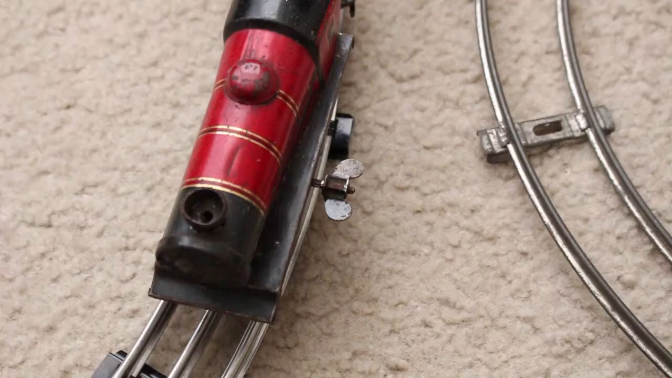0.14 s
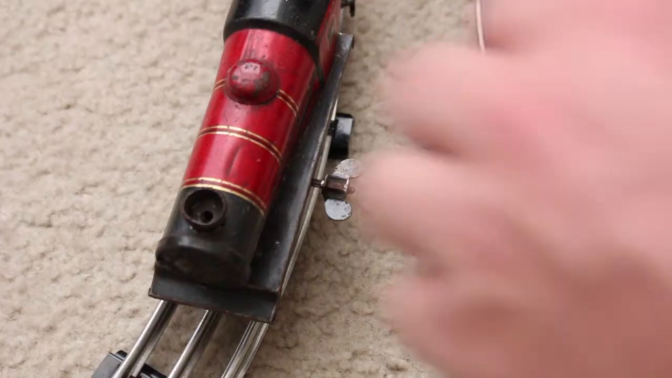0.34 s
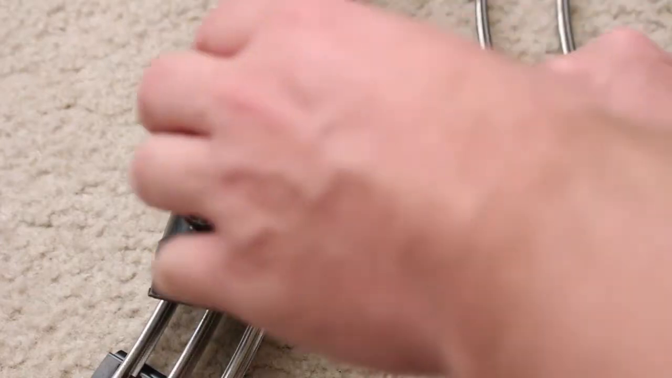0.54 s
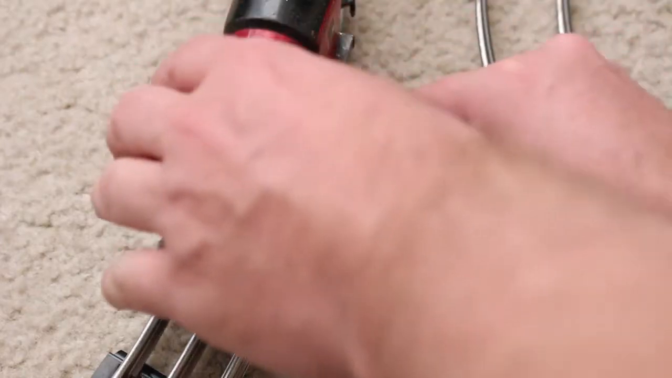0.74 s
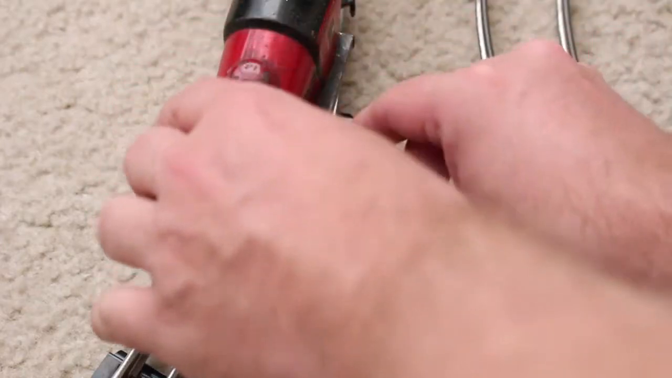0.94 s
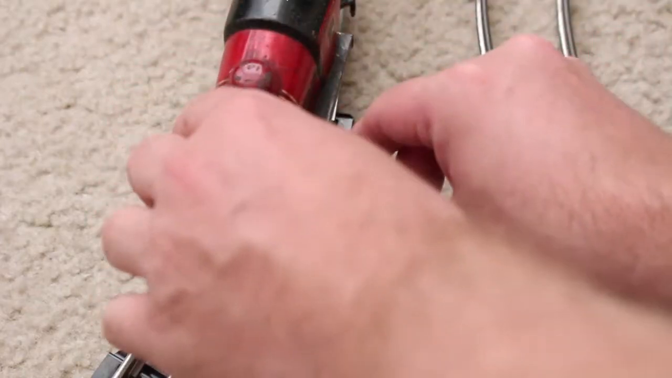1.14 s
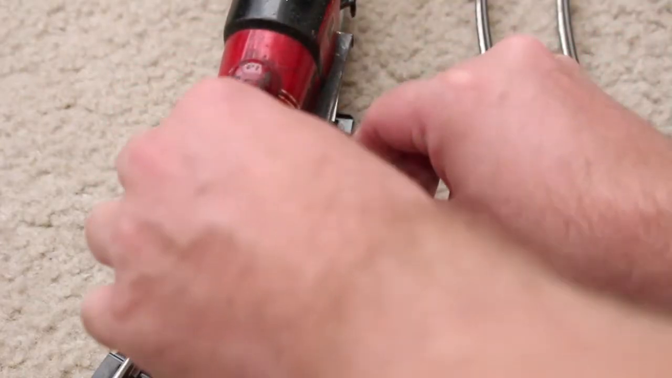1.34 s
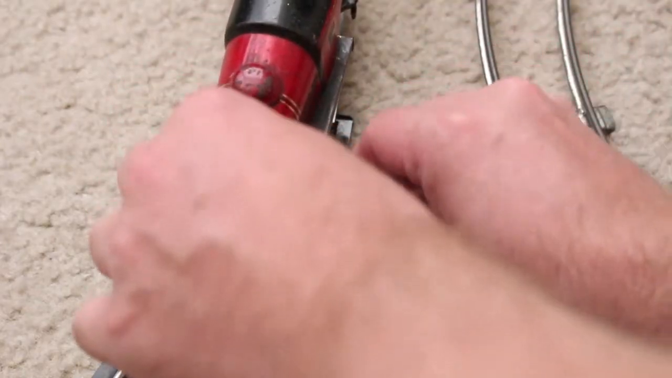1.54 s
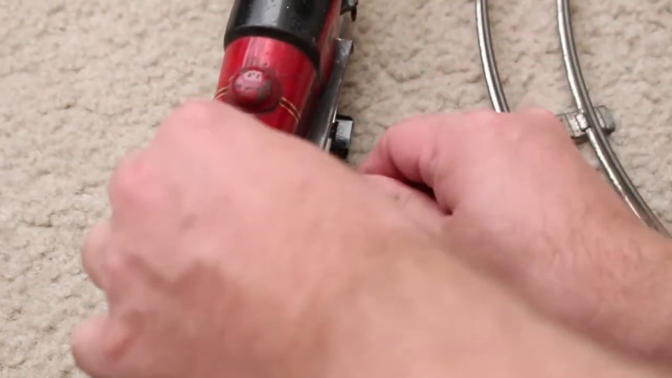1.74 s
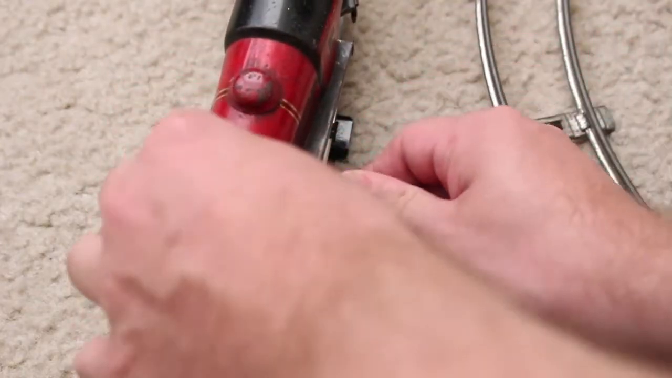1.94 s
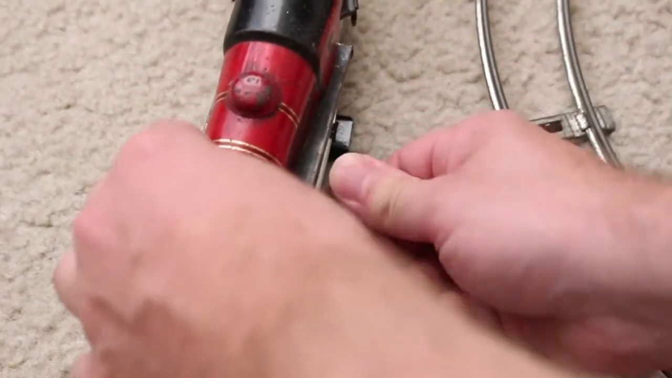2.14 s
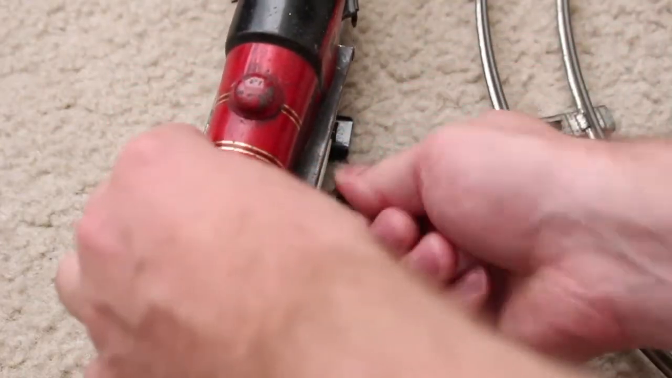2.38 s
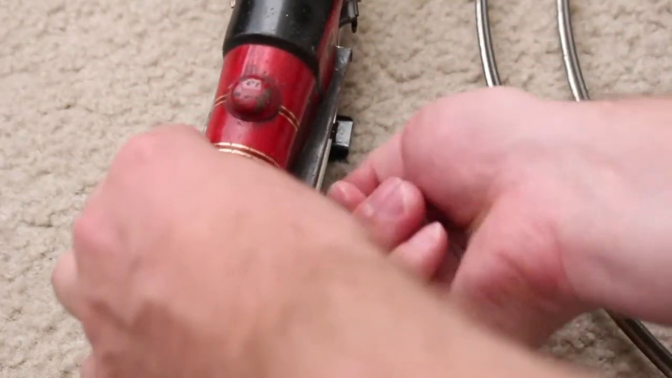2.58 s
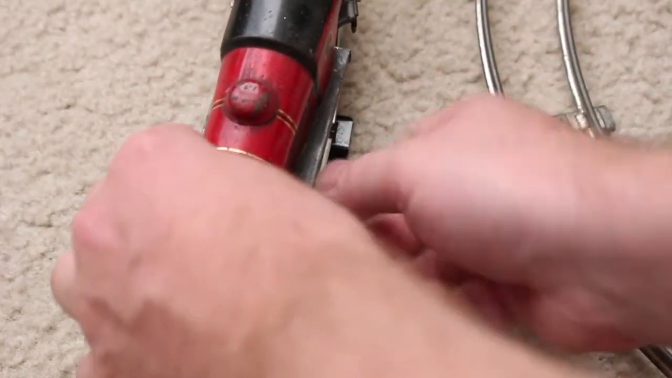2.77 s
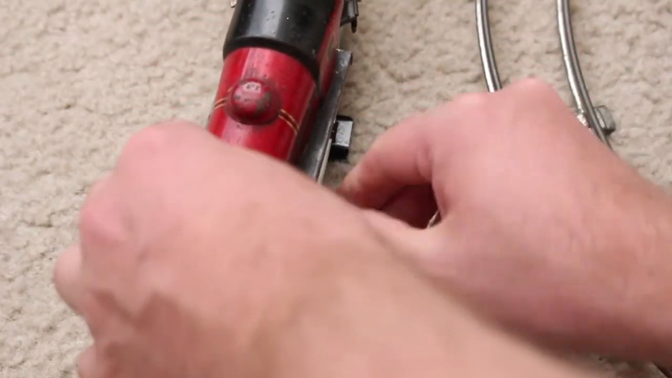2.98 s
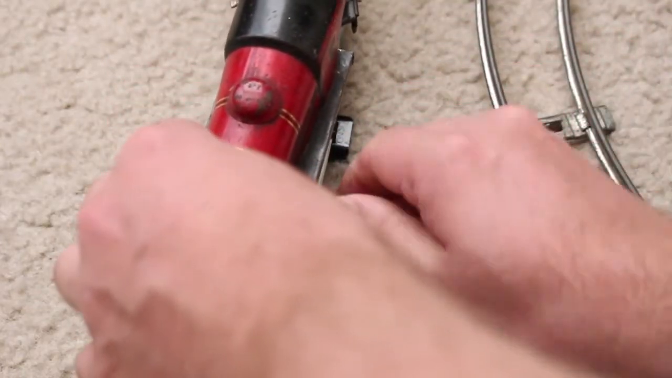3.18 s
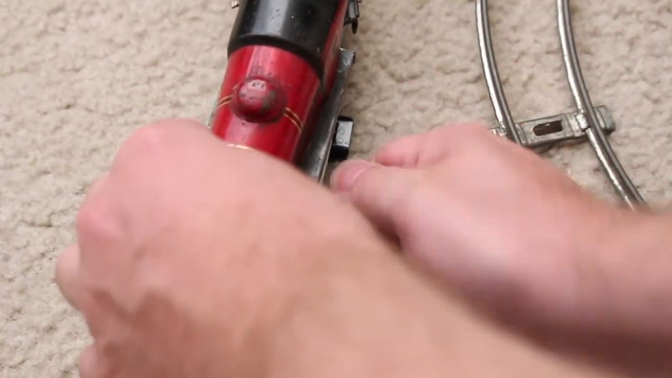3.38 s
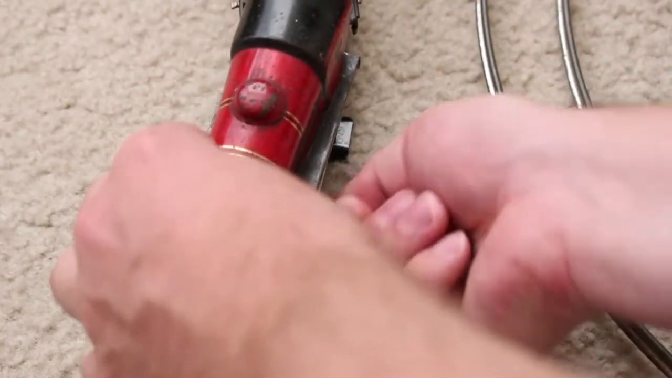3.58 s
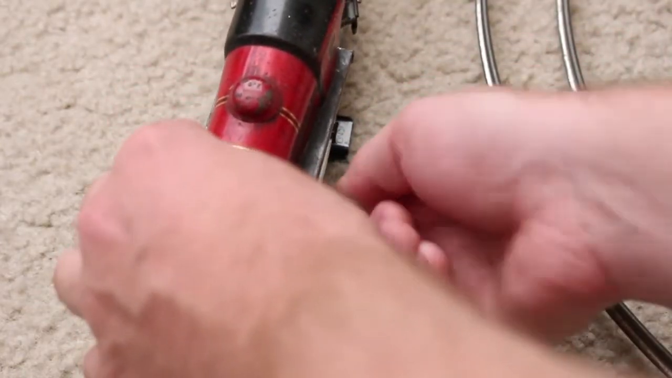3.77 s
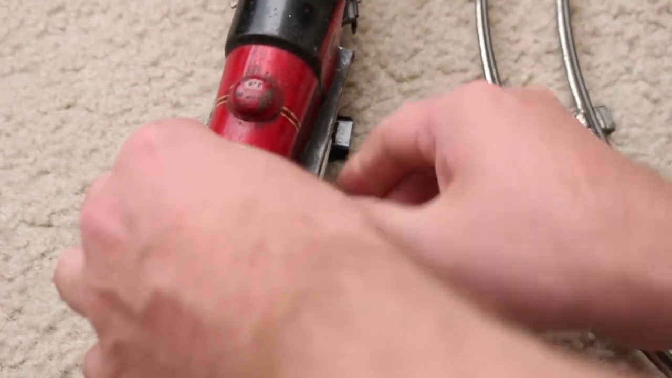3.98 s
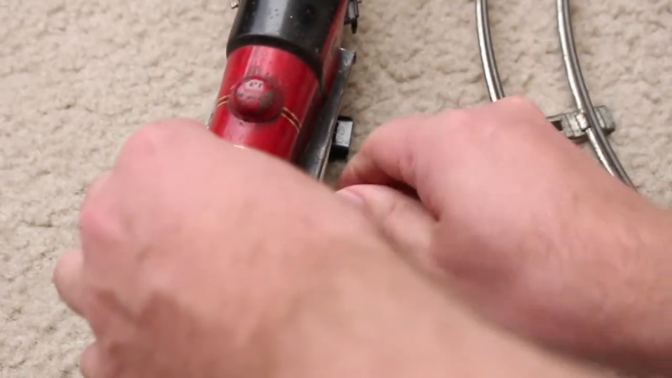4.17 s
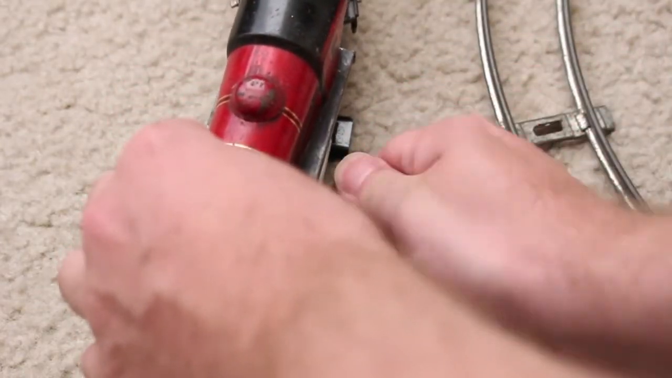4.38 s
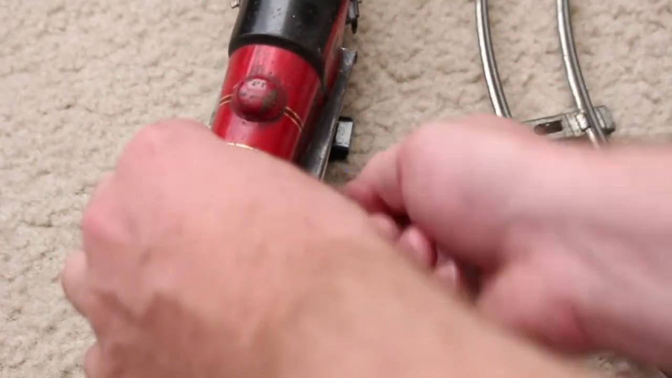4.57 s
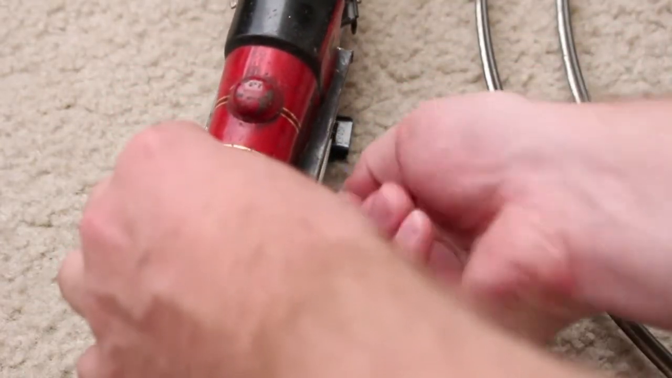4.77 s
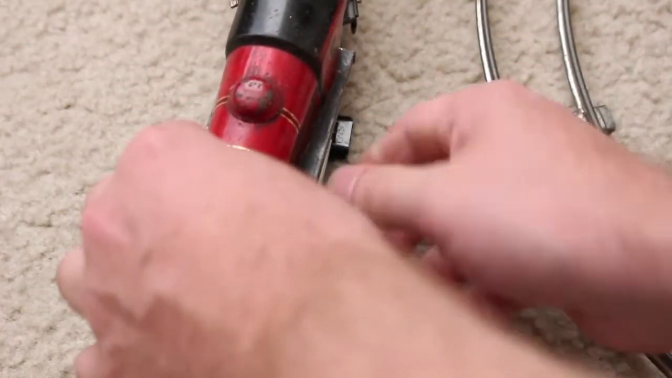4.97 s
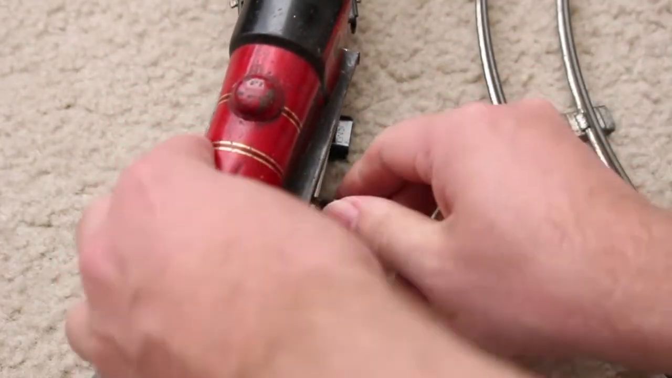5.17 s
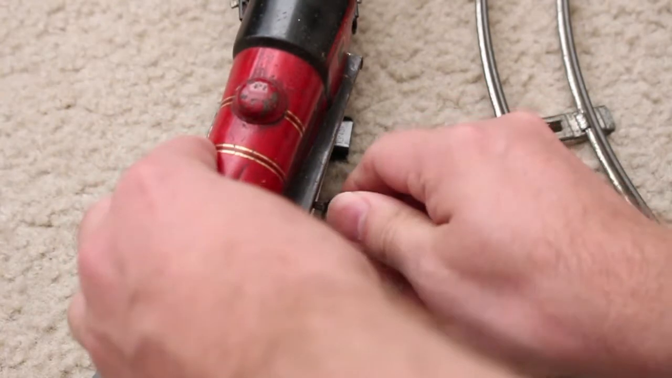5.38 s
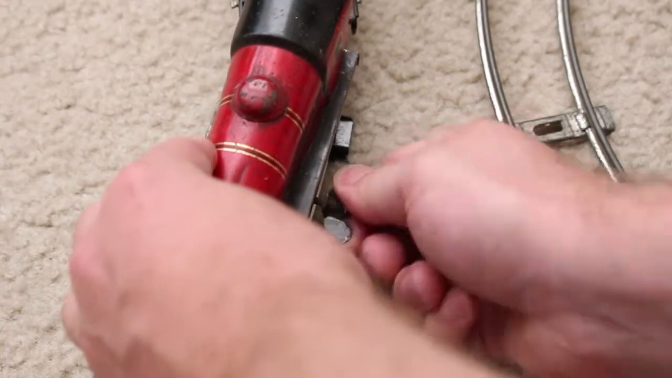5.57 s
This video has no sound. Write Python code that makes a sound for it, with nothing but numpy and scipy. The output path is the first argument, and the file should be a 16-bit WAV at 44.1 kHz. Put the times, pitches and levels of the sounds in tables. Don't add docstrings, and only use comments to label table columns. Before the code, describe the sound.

A tin clockwork toy engine is wound by key in a quiet carpeted room, giving short bursts of hard ratchet clicks.

```python
import sys
import numpy as np
from scipy import signal
from scipy.fft import rfft, irfft, next_fast_len
from scipy.io import wavfile

SR = 44100
rng = np.random.default_rng(int(sys.argv[2]) if len(sys.argv) > 2 else 0)


def linear_from_db(decibels):
    return 10 ** (np.asarray(decibels, float) / 20)


def put_to_file(sound):
    columns = np.atleast_2d(sound).T
    safe = np.clip(columns, -1, 1)
    whole_steps = np.round(safe * 32767)
    wavfile.write(sys.argv[1], SR, whole_steps.astype(np.int16))


N = 247842


def rms_one(x):
    return x / np.sqrt(np.mean(x ** 2) + 1e-20)


def at_hz(points, hz):
    table_hz, values = np.array(points).T
    return np.interp(np.log(hz), np.log(table_hz), values)


def butter(x, order, hz, kind):
    return signal.sosfilt(signal.butter(order, hz, kind, fs=SR, output="sos"), x)


# time in seconds, level in dB.
PRESSES = [(0.5, -72), (1.76, -69.5), (2.3, -64), (2.65, -70), (2.98, -72), (3.41, -55), (3.8, -69),
           (4.5, -62.5), (4.75, -61.5), (5.3, -61.5)]


def rumble():
    lumps = butter(rng.standard_normal((2, N)), 2, [55, 105], "band")
    t = np.arange(N) / SR
    press_s, resting_db = 0.093, -77.5
    load = linear_from_db(resting_db)
    for s, db in PRESSES:
        load = load + linear_from_db(db) * np.exp(-((t - s) / press_s) ** 2)
    return linear_from_db(12.0) * load * rms_one(lumps) * linear_from_db([[-2.5], [2.5]])


# frequency in Hz, density in dB per Hz.
HISS = [(25, -15), (70, -18), (195, -4), (285, -12), (2000, -17.5), (4490, -21), (15000, -30), (16100, -58)]
# frequency in Hz, correlation from -1 to 1.
LIKENESS = [(60, 0.72), (130, 0.73), (290, 0.44), (640, -0.11), (1410, 0.073), (3100, -0.22),
            (6820, 0.0086), (15000, -0.0071)]
# frequency in Hz, left minus right in dB.
LEANING = [(60, -7), (240, -3), (950, -1.0), (3770, -0.5), (15000, -2)]


def hiss():
    hz = np.maximum(np.fft.rfftfreq(N, 1 / SR), 1)
    mid, side = rfft(rng.standard_normal((2, N)))
    alike = np.clip(at_hz(LIKENESS, hz) - 0.12, -1, 1)
    lean_db = at_hz(LEANING, hz) / 2
    shared, opposed = np.sqrt(1 + alike) * mid, np.sqrt(1 - alike) * side
    left = (shared + opposed) * linear_from_db(lean_db)
    right = (shared - opposed) * linear_from_db(-lean_db)
    return linear_from_db(-46) * rms_one(irfft(np.array([left, right]) * linear_from_db(at_hz(HISS, hz)), N))


# frequency in Hz, t60 in seconds.
ROOM = [(300, 0.72), (800, 0.51), (2100, 0.35), (5500, 0.3), (14600, 0.08)]
# frequency in Hz, side over mid in dB.
WIDTH = [(400, -3), (1500, -5.5), (2500, -6), (5000, -4.5), (12000, 1)]
# frequency in Hz, level in dB.
WETNESS = [(400, -1), (900, -4.5), (1500, -6), (2500, -3), (3500, -1.5), (5000, 2.5), (12000, 7.5)]


def room(x):
    t = np.arange(int(0.35 * SR)) / SR
    white = rng.standard_normal((2, 2, len(t)))
    edges = 200 * 2 ** np.arange(0, 6.6, 0.5)
    tail = 0
    for k, (low, high) in enumerate(zip(edges, edges[1:])):
        mid, side = butter(white[k % 2], 2, [low, high], "band")
        hz = np.sqrt(low * high)
        fading = linear_from_db(at_hz(WETNESS, hz) - 60 * t / at_hz(ROOM, hz))
        tail = tail + (mid + linear_from_db(at_hz(WIDTH, hz)) * side * [[1], [-1]]) * fading
    tail = linear_from_db(-32.5) * tail * (1 - np.exp(-t / 0.0012))
    return signal.fftconvolve(x[None], tail, axes=1)[:, :N]


def moving_room(x, count=6):
    turn = np.arange(N) / SR * 1.55
    shares = np.cos(np.pi * (turn + np.arange(count)[:, None] / count)) ** 8
    shares = shares / np.sqrt((shares ** 2).sum(axis=0))
    return sum(room(x * share) for share in shares)


def ring(force, modes, extra_db):
    out = np.zeros((2, len(force)))
    strike = np.arange(len(force)) == np.argmax(np.abs(force))
    both = np.array([force, strike]) + 1e-18
    for k, ((hz, level_db, t60), more_db) in enumerate(zip(modes, extra_db)):
        r = linear_from_db(-60 / (max(t60, 0.001) * SR))
        w = 2 * np.pi * hz / SR
        mode = signal.lfilter([0, np.sin(w)], [1, -2 * r * np.cos(w), r * r], both)
        size = np.sqrt((mode ** 2).sum(axis=1, keepdims=True) / t60)
        out += (-1) ** k * linear_from_db(level_db + more_db) * mode / size
    return out / np.sqrt((out ** 2).sum(axis=1, keepdims=True))


def chatter(draws, ms, delay_ms, size=5000):
    count = len(draws) // 2
    lag_ms = ms * draws[:count] ** 1.3 * 3.1
    signed = 2 * draws[count:] - 1
    at = np.clip((lag_ms + delay_ms) * SR / 1000, 0, size - 1).astype(int)
    force = np.zeros(size)
    np.add.at(force, at, (0.3 + lag_ms / ms) * np.exp(-1.6 * lag_ms / ms) * signed)
    return force


# frequency in Hz, level in dB, t60 in seconds.
SHELL = [(1200, -5.5, 0.015), (1170, -2, 0.004), (1314, -3.5, 0.018), (1376, -8, 0.019), (1543, -21, 0.22),
         (1560, 4.5, 0.04), (1675, -3, 0.045), (1789, 0, 0.022), (1950, -13, 0.0034), (2056, -6, 0.016),
         (2127, -1, 0.031), (2220, 0, 0.031), (2430, -4, 0.035), (2453, -1.5, 0.045)]
# frequency in Hz, level in dB, t60 in seconds.
STEEL = [(5040, 4.5, 0.0008), (7004, 1, 0.0027), (7310, 3, 0.0022), (9020, 3, 0.0011), (10560, -2, 0.0021),
         (11600, -3, 0.002), (13100, 1, 0.00097), (15900, -4, 0.00078)]
# frequency in Hz, level in dB, t60 in seconds.
THUD = [(460, -5.5, 0.016), (646, -10, 0.023), (906, -2, 0.0097)]
# frequency in Hz, level in dB, t60 in seconds.
FRAME = [(2880, -6, 0.027), (3260, 8.5, 0.013), (3570, -3, 0.036), (3583, 5.5, 0.022), (3960, -3.5, 0.0085),
         (4420, -2, 0.011)]


def touches(events, ms, steel_late_ms, gain_db):
    out = np.zeros((2, N + SR))
    for s, db, hz, thud_db, frame_db, steel_db in events:
        d = rng.random((4, 60))
        z = rng.standard_normal(40)
        near_db = -11.0 * np.abs(np.log2(np.array(SHELL)[:, 0] / hz))
        dull_db = 0.42 * (db + 19.5) * np.log2(np.array(STEEL)[:, 0] / 7000)
        sound = ring(chatter(d[0], ms, 0), SHELL, near_db + 1.4 * z[:len(SHELL)])
        boiler = [(hz, 0, 0.0055)]
        sound += linear_from_db(-1.5) * ring(chatter(d[0], ms, 0.2), boiler, [0])
        sound = butter(sound, 1, 800, "high")
        sound += linear_from_db(thud_db + 11.5) * ring(chatter(d[1], ms, 0.49), THUD, 1.8 * z[14:17])
        plates = chatter(d[2], ms, 0.7 * steel_late_ms)
        sound += linear_from_db(frame_db + 11.5) * ring(plates, FRAME, 2.1 * z[18:24])
        works = chatter(d[3], 0.9 * ms, steel_late_ms)
        sound += linear_from_db(steel_db + 14.0) * ring(works, STEEL, dull_db + 1.24 * z[26:34])
        at = round((s - 0.0012) * SR)
        out[:, at:at + 5000] += linear_from_db(db + gain_db) * sound
    return out[:, :N]


def sharp(events):
    return touches(events, ms=1.7, steel_late_ms=1.1, gain_db=20.0)


def scuff(events):
    return touches(events, ms=9.0, steel_late_ms=0.35, gain_db=22.0)


def scuff_thud_db(s):
    return -35.0 + 3.5 * s


# start in seconds, peak in dB, shell pitch in Hz, thud share in dB, steel share in dB.
BUMPS = [(1.696, -40, 1280, -12, -21), (2.87, -46, 900, -4, -30), (2.973, -33, 1680, -11, -30),
         (3.014, -33, 900, -9, -12), (5.014, -38, 1530, -14, -19)]


def bumps():
    return sharp([(s, db, hz, thud, -25.0, steel) for s, db, hz, thud, steel in BUMPS])


# start in seconds, peak in dB, shell pitch in Hz, steel share in dB.
RUBS = [(1.511, -36.5, 2190, -23), (1.521, -31, 1790, -17), (1.536, -33, 1680, -18),
        (1.578, -41, 1810, -22), (1.659, -48, 2020, -24), (1.743, -32, 1830, -29), (2.134, -37, 1500, -22),
        (2.438, -43, 1560, -16), (2.569, -29, 1650, -19.5), (2.796, -40, 1170, -21),
        (2.819, -37.5, 1600, -26), (2.848, -40.5, 1660, -27), (3.264, -33, 2050, -10.5),
        (3.922, -39, 1590, -27), (4.276, -34.5, 2140, -25), (4.29, -31, 1620, -14),
        (4.306, -29.5, 1750, -23), (4.857, -31.5, 1900, -21), (4.87, -28.5, 1850, -19),
        (4.88, -35, 1580, -21), (5.152, -45, 1580, -15), (5.196, -33, 1870, -24), (5.209, -36.5, 1880, -18),
        (4.735, -33, 2200, -24), (5.315, -34.5, 1600, -26), (5.331, -32.5, 1850, -18.5),
        (2.674, -35, 1950, -24), (5.544, -30.5, 2430, -22)]


def rubs():
    return scuff([(s, db, hz, scuff_thud_db(s), -19.5, steel) for s, db, hz, steel in RUBS])


# start in seconds, peak in dB, shell pitch in Hz, steel share in dB.
KNOCKS = [(1.086, -41, 2530, -34), (1.161, -39, 1740, -33), (1.321, -45.5, 2530, -28),
          (1.601, -33.5, 2220, -26), (2.213, -32, 1530, -18), (2.494, -29.5, 1620, -14),
          (2.657, -30, 1640, -13), (3.238, -30, 2050, -17.5), (3.323, -33.5, 2120, -19.5),
          (3.549, -38, 2170, -11), (3.721, -32.5, 1720, -20), (3.764, -37, 1720, -17),
          (3.78, -31, 1620, -12.5), (4.056, -30.5, 1600, -15), (4.433, -31, 1600, -12),
          (4.719, -28.5, 2150, -17), (4.792, -38.5, 2130, -13.5), (5.244, -29, 1950, -33),
          (5.511, -32.5, 1610, -17)]


def key_knocks():
    return sharp([(s, db, hz, -27.0, -21.0, steel) for s, db, hz, steel in KNOCKS])


# start in seconds, peak in dB, shell pitch in Hz.
RELEASE = [(2.1434, -18, 1300), (1.762, -12.5, 1980), (4.3915, -21, 2200), (3.556, -23, 1430)]


def shell_release():
    return sharp([(s, db, hz, -50, -50, -50) for s, db, hz in RELEASE])


# start in seconds, peak in dB, pitch in Hz where the shell
# rings most, frame share in dB, steel share in dB.
SNAPS = [(1.761, -13.5, 1600, -18.5, -11), (2.146, -14.5, 2160, -14, -11), (2.334, -22, 2300, -8, -9.5),
         (2.464, -14, 1540, -17.5, -19), (2.539, -20, 2080, -19.5, -14), (2.7, -27.5, 2070, -19.5, -17),
         (3.379, -16, 1800, -18, -14.5), (3.468, -21.5, 1400, -15.5, -13), (3.557, -19.5, 2100, -15, -12.5),
         (3.643, -14.5, 1540, -21.5, -14.5), (3.82, -23.5, 1700, -24, -19), (3.832, -24, 1850, -19, -19),
         (4.391, -13.5, 1670, -21, -11.5), (4.524, -19.5, 2110, -15, -13.5),
         (4.627, -20.5, 2140, -12.5, -12.5), (4.69, -18.5, 2100, -17, -14), (4.82, -25, 1800, -20, -16.5),
         (5.398, -29, 2420, -13, -13.5), (5.53, -20.5, 2050, -14.5, -13.5), (5.611, -19, 2100, -27, -19.5)]


def key_rattle():
    return scuff([(s + 0.013, db - 17.0, hz, scuff_thud_db(s), -19.5, -22.0)
                  for s, db, hz, _, _ in SNAPS])


def snaps():
    return sharp([(s, db, hz, -46.0 + 5.0 * s, frame, steel) for s, db, hz, frame, steel in SNAPS])


def locomotive():
    touched = bumps() + rubs() + key_knocks() + shell_release() + key_rattle() + snaps()
    return butter(touched, 3, 420, "highpass")


def scene():
    engine, radiated = locomotive()
    tail = moving_room(0.5 * engine + radiated)
    for ms, db in [(6.0, -6.5), (11.5, -14.0)]:
        engine = engine + linear_from_db(db) * np.roll(engine, round(ms * SR / 1000))
    turned = signal.hilbert(engine, next_fast_len(N))[:N].imag
    high = signal.butter(1, 3000, "high", fs=SR, output="sos")
    wide = signal.sosfiltfilt(high, turned)
    placed = (engine + 0.75 * wide * [[1], [-1]] + tail) * linear_from_db([[-0.8], [0.8]])
    return placed + hiss() + rumble()


# time in seconds, level in dB.
OPENING = [(.072, -60), (.074, -53), (.1, -39), (.122, -15.5)]


def fade_in(x):
    t = np.arange(N) / SR
    return x * linear_from_db(np.interp(t, *np.transpose(OPENING))) * (t > 0.072)


def top_cut(x):
    return signal.sosfilt(signal.butter(12, 16490, fs=SR, output="sos"), x)


def record(dry):
    cut = signal.sosfilt(signal.cheby2(12, 70, 16600, fs=SR, output="sos"), dry)
    return top_cut(fade_in(cut))


dry = scene()
out = record(dry)
put_to_file(out)
```